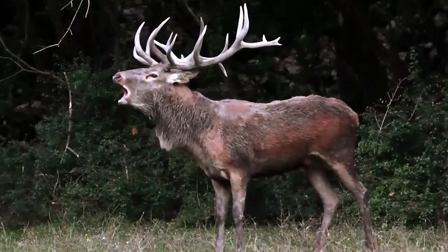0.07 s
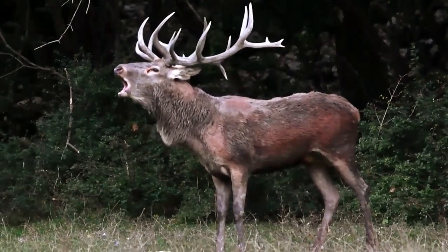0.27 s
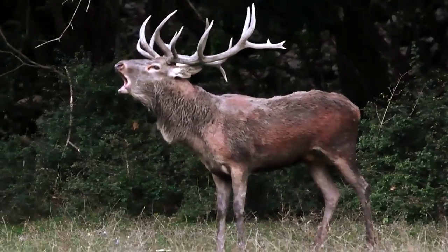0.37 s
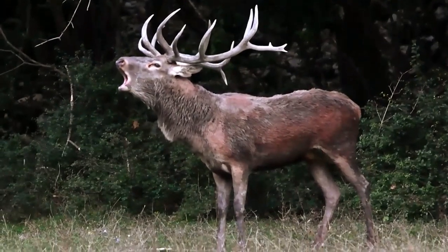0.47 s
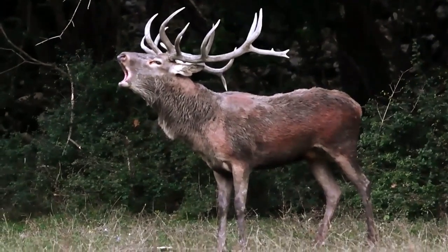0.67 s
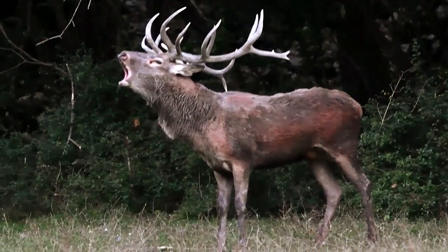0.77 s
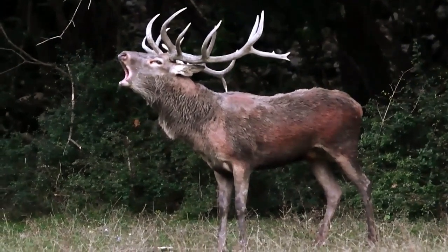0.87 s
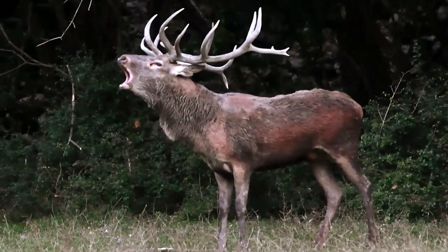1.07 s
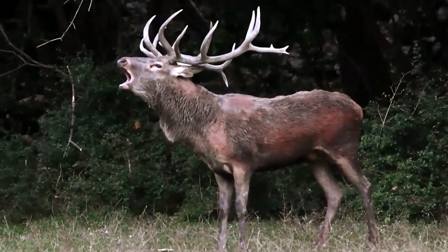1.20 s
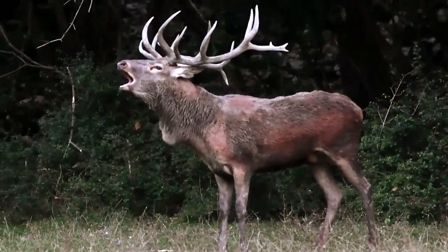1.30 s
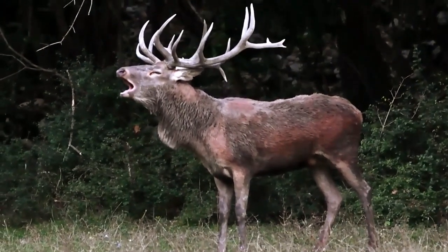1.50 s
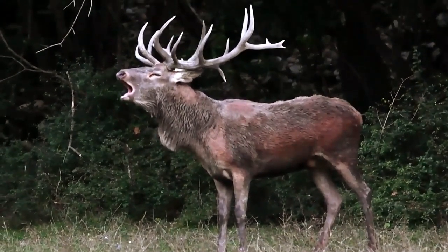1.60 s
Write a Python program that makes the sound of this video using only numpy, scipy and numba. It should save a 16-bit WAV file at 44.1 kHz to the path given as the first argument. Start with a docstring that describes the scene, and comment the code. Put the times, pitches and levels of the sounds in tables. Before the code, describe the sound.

A red deer stag gives one deep, harsh bellow, starting at about 0.2 seconds as a bright, tense roar that rises and swells. From 0.6 seconds the pitch sinks with a breathy hiss, breaking into a coarse rattle around 0.9 seconds. A steadier growl follows at 1.2 seconds and stops near 1.4, leaving a short echo from the trees over a quiet, low outdoor background.

```python
"""A red deer stag bellowing

One long bellow at the edge of a wood, by the source-filter principle: vocal-fold pulses ring a long throat.
A bright, tense roar comes first; the larynx drops and the folds rattle; a steadier growl closes the call.
Breath hisses in the mouth, and the trees echo over a quiet outdoor background that holds a faint
lingering ring of the stag's voice."""
import sys
import numpy as np
from scipy import signal
from scipy.fft import rfft, irfft
from scipy.io import wavfile
from scipy.ndimage import uniform_filter1d
from numba import njit

SR = 44100
rng = np.random.default_rng(int(sys.argv[2]) if len(sys.argv) > 2 else 0)


def transcribe(u):
    """Save the signal u as a 16-bit wav file named by the first command-line argument.

    u: samples, shape (n,) or (channels, n), limited to [-1, 1]; the rate is SR.
    q: integer samples, one column per channel.
    """
    v = np.clip(np.atleast_2d(u).T, -1, 1)
    q = np.round(v * 32767).astype(np.int16)
    wavfile.write(sys.argv[1], SR, q)


N = 72765

# outdoor background, with the voice's lingering ring at 145, 450 and 2200 Hz: frequency_hz, gain_db
BACKGROUND_SPECTRUM = [(25, -31), (45, -4), (62, -12.5), (90, -6.5), (145, -3), (280, -12.5), (380, -6),
                       (450, -3.5), (560, -17), (700, -18), (870, -9.5), (1200, -18.5), (2200, -16.5),
                       (3500, -26.5), (6000, -33.5), (16000, -34.5)]
# further shaping of its left-right difference: frequency_hz, gain_db
BACKGROUND_SIDE_SPECTRUM = [(250, -32), (900, -1.5), (4000, 6.5), (12000, -3)]
# pulse rate of the vocal folds: time_s, pitch_hz
FOLD_PITCH = [(.18, 73.8), (.2, 100), (.226, 113.1), (.27, 121.8), (.318, 135.6), (.4, 132.6),
              (.472, 130.5), (.546, 134.4), (.602, 122.5), (.648, 119.5), (.7, 115.2), (.8, 109.2),
              (.86, 100.5), (.93, 86.34), (1.1, 83.57), (1.17, 87.2), (1.22, 101), (1.39, 98.22)]
# irregularity of the folds: time_s, roughness_fraction
FOLD_ROUGHNESS = [(.18, .04), (.29, .09), (.34, .05), (.5, .06), (.56, .14), (.64, .17), (.69, .07),
                  (.78, .06), (.85, .35), (.92, .8), (1.15, .8), (1.23, .17), (1.33, .16), (1.38, .5)]
# slackness of the folds: time_s, slack_fraction
FOLD_SLACK = [(.2, 0.04), (.28, 0.11), (.35, 0.07), (.47, 0.05), (.51, 0.11), (.55, 0.34), (.7, 0.63),
              (.77, 0.68), (.86, 0.99), (1.15, 0.91), (1.3, 0.79)]
# six lower formants as the neck stretches: time_s, formant1_hz ... formant6_hz
FORMANT_TRACKS = [(.33, 246, 757, 1010, 1216, 1475, 1854), (.48, 252, 664, 965, 1083, 1452, 1906),
                  (.54, 261, 640, 975, 1050, 1448, 1950), (.6, 247.3, 439, 962, 991, 1318, 1910),
                  (.68, 226, 432, 927, 1000, 1270, 1874), (.78, 208, 428, 874, 1120, 1230, 1660),
                  (.88, 193, 487, 788, 1036, 1222, 1618), (1.1, 186, 460, 827, 965, 1201, 1761),
                  (1.25, 210, 512.5, 897, 1074, 1266, 1727), (1.38, 216, 479.4, 865, 1060, 1273, 1863)]
# the same six by state of the folds: width_hz, tense_db, half_slack_db, slack_db
LOWER_FORMANTS = [(54.6, -51, -30, -34), (37.8, -11.5, -8.5, -4.5), (54, -2, 4, -7), (46.3, 4.5, -14, -3.5),
                  (46.5, 6, 2, 1.5), (58, 0.5, 4, -3.5)]
# steady upper formants: centre_hz, width_hz, tense_db, half_slack_db, slack_db
UPPER_FORMANTS = [(1502, 21.5, -29, -8, -6.5), (2152.6, 71.4, -1, 4, -0.5), (2265, 90, -1.5, -2, -12),
                  (2520, 32, -8.5, -4, -5.5), (2875, 113, -8.5, -2, -9), (3019, 92, -18, -7, -13),
                  (3350, 92, -15.5, -9, -18), (3960, 60, -17, -43, -28), (5204, 140, -27.5, -33, -28.5)]
# envelope of the roar: time_s, relative_level_db
ROAR_ENVELOPE = [(0.17, -60), (0.176, -41.5), (0.226, -26), (0.318, -17.5), (0.416, -14.5), (0.544, -18.5),
                 (0.776, -17.5), (0.816, -28), (0.83, -24), (0.87, -35), (0.904, -22.5), (0.914, -27.5),
                 (0.962, -23), (0.978, -24.5), (0.994, -21.5), (1.102, -29), (1.258, -22.5), (1.372, -24.5),
                 (1.38, -36)]
# envelope of the chest resonance: time_s, relative_level_db
CHEST_ENVELOPE = [(0.2, -59), (0.278, -37.5), (0.62, -35.5), (0.882, -22), (1.06, -29.5), (1.17, -23.5),
                  (1.204, -28), (1.224, -26), (1.39, -29.5)]
# chest filter, weak below the resonance: frequency_hz, gain_db
CHEST_SPECTRUM = [(60, -13), (120, -21), (160, 2.5), (230, -2.5), (400, 5.5), (600, -25)]
# envelope of the third harmonic: time_s, level_db
THIRD_ENVELOPE = [(.5, -54), (.62, -42), (.73, -34), (.84, -33.5), (.92, -69), (1.18, -78), (1.25, -36),
                  (1.38, -52)]
# envelope of the breath hiss: time_s, relative_level_db
HISS_ENVELOPE = [(0.2, -69), (0.208, -58), (0.246, -54.5), (0.428, -54.5), (0.666, -35), (0.766, -42.5),
                 (0.832, -36), (0.846, -47.5), (1.17, -51.5), (1.256, -39.5), (1.36, -68), (1.39, -57)]
# steady mouth resonances: centre_hz, width_hz, gain_db
MOUTH_RESONANCES = [(5310, 190, 3.5), (6355, 137, 8), (8620, 630, -3)]
# moving resonance of the jaw opening: time_s, centre_hz
JAW_TRACK = [(.55, 7300), (.67, 7350), (.74, 6670), (.83, 6040), (1.15, 7030), (1.28, 7570)]
# single hard slaps of the folds: start_s, relative_level_db
FOLD_SLAPS = [(.653, 3), (.9, 3), (.948, 2), (.995, 5), (1.02, 5), (1.056, 0), (1.118, -1), (1.166, 1),
              (1.366, 5)]
# share added on the right and taken from the left, mainly treble: frequency_hz, gain_db
RIGHT_BIAS = [(300, -39), (600, -19), (1100, -26.5), (2200, -5), (4000, -38), (8000, -5)]
# scatter from the bushes: frequency_hz, gain_db
BUSH_SPECTRUM = [(300, -23), (600, -19), (1200, -13), (2400, 1.5), (8000, 3)]
# echo from the trees: frequency_hz, gain_db
WOOD_SPECTRUM = [(100, -0.5), (250, 6), (480, 13), (900, 8.5), (2200, 4), (4000, 11), (10000, 13)]
# left-right difference of the reflections: frequency_hz, gain_db
TAIL_SIDE_SPECTRUM = [(250, -51), (600, -10.5), (1800, -1.5)]

START_S, END_S, ATTACK_S, RELEASE_S = .176, 1.385, .002, .022
JITTER_CYCLES, SHIMMER_DB, PUFF_DECAY_CYCLES = .14, 3.0, .25
ROAR_DB, CHEST_DB, FUNDAMENTAL_DB, HISS_DB, SLAP_DB = -1.5, -1.6, -43.5, -4.5, 15
BACKGROUND_DB, BUSH_DB, WOOD_DB = -43, -7, -9
TIME_S = np.arange(N) / SR
SIDE_SIGNS = np.array([[1], [-1]])  # left, right


def undb(db):
    """Amplitude grows tenfold every 20 dB."""
    return 10 ** (np.asarray(db) / 20)


def curve(rows, column=1):
    """Linear interpolation of a table column in time."""
    rows = np.array(rows, float)
    return np.interp(TIME_S, rows[:, 0], rows[:, column])


def unit_rms(x):
    """Normalisation to unit mean power."""
    return x / np.sqrt(np.mean(x ** 2) + 1e-18)


def flatten(x, size=1100):
    """Division by the running rms evens out the envelope."""
    power = uniform_filter1d(uniform_filter1d(x ** 2, size), size)
    return x / np.sqrt(np.abs(power) + np.mean(x ** 2) / 1000)


def colour(x, spectrum):
    """Zero-phase filtering by gains interpolated over log frequency."""
    hz, db = np.array(spectrum, float).T
    bins_hz = np.maximum(np.fft.rfftfreq(x.shape[-1], 1 / SR), 1)
    gain = undb(np.interp(np.log(bins_hz), np.log(hz), db))
    return irfft(rfft(x) * gain, x.shape[-1])


@njit
def bandpass(x, hz, width_hz):
    """A driven, damped oscillator with unit gain at its moving centre."""
    y, band_state, low_state = np.empty(len(x)), 0., 0.
    for i in range(len(x)):
        step, damping = np.tan(np.pi * hz[i] / SR), width_hz / hz[i]
        band = (band_state + step * (x[i] + 1e-18 - low_state)) / (1 + step * (step + damping))
        band_state = 2 * band - band_state
        low_state += 2 * step * band
        y[i] = damping * band
    return y


def resonance(x, hz, width_hz):
    """Filters in cascade: a second, wider band-pass steepens the skirts."""
    hz = hz * np.ones(N)
    return bandpass(bandpass(x, hz, float(width_hz)), hz, width_hz * 3.1)


def impulses(times_s, sizes):
    """Windowed sinc interpolation places band-limited impulses between samples."""
    train, centres = np.zeros(N), np.asarray(times_s)[:, None] * SR
    taps = np.floor(centres).astype(int) + np.arange(-7, 9)
    offset = taps - centres
    np.add.at(train, np.clip(taps, 0, N - 1), np.sinc(offset) * np.sinc(offset / 8) * sizes[:, None])
    return train


def background():
    """Partly coherent noise, alike on both sides in the bass, with a faint ring of the stag's voice."""
    mid, side = colour(rng.standard_normal((2, N)), BACKGROUND_SPECTRUM)
    side = .64 * colour(side, BACKGROUND_SIDE_SPECTRUM)
    return undb(BACKGROUND_DB) * (mid + side * SIDE_SIGNS) / np.std(mid)


def vocal_folds(cycles):
    """Glottal source: each closure gives a pulse and a puff; roughness adds jitter and shimmer."""
    first_cycle = np.interp(START_S + ATTACK_S, TIME_S, cycles) % 1
    regular_s = np.interp(np.arange(int(cycles[-1])) + first_cycle, cycles, TIME_S)
    roughness = np.interp(regular_s, TIME_S, curve(FOLD_ROUGHNESS))
    pitch_hz = np.interp(regular_s, TIME_S, curve(FOLD_PITCH))
    jitter, shimmer = rng.standard_normal((220, 2))[:len(regular_s)].T
    closures_s = np.sort(regular_s + JITTER_CYCLES * roughness ** 1.35 * jitter / pitch_hz)
    pulses = impulses(closures_s, undb(SHIMMER_DB * np.sqrt(roughness) * shimmer))
    phase = np.interp(TIME_S, closures_s, np.arange(len(closures_s))) % 1
    puffs = np.exp(-phase / PUFF_DECAY_CYCLES) * rng.standard_normal(N)
    return unit_rms(pulses), unit_rms(puffs)


def disperse(x, delay_s_per_hz=7e-7):
    """Dispersion: high partials leave the long throat after low ones, rounding each pulse."""
    hz = np.fft.rfftfreq(N, 1 / SR)
    return irfft(rfft(x) * np.exp(-1j * np.pi * delay_s_per_hz * hz ** 2), N)


def throat(source):
    """Formant filtering: parallel resonances whose balance shifts as the folds slacken."""
    slack, source = curve(FOLD_SLACK), disperse(source)
    moving = [(curve(FORMANT_TRACKS, k + 1), *row) for k, row in enumerate(LOWER_FORMANTS)]
    return sum(undb(np.interp(slack, [0, .5, 1], gains_db)) * resonance(source, hz, width_hz)
               for hz, width_hz, *gains_db in moving + list(UPPER_FORMANTS))


def chest_tone(source, cycles, swell_s=.18):
    """Forced resonance at the lowest formant, joined by the folds' first and third harmonics."""
    boom = flatten(resonance(source, curve(FORMANT_TRACKS), width_hz=35))
    boom *= undb(curve(CHEST_ENVELOPE) + CHEST_DB)
    swell = np.clip((TIME_S - START_S) / swell_s, 0, 1)
    fundamental = undb(FUNDAMENTAL_DB) * unit_rms(np.sin(2 * np.pi * cycles)) * swell
    third = undb(curve(THIRD_ENVELOPE)) * unit_rms(np.sin(6 * np.pi * cycles))
    return colour(boom, CHEST_SPECTRUM) + fundamental + third


def breath_hiss(pulses, puffs):
    """Cavity resonance: breath noise and fold pulses excite the mouth and jaw opening."""
    source = puffs + .6 * pulses
    mouth = sum(undb(db) * resonance(source, hz, width_hz) for hz, width_hz, db in MOUTH_RESONANCES)
    jaw = undb(2) * resonance(source, curve(JAW_TRACK), width_hz=950)
    return flatten(mouth + jaw) * undb(curve(HISS_ENVELOPE) + HISS_DB)


def diffuse_tail(t60_s, rise_s, spectrum):
    """Dense reflections merge into exponentially decaying stereo noise."""
    mid, side = rng.standard_normal((2, N))
    noise = colour(mid + colour(side, TAIL_SIDE_SPECTRUM) * SIDE_SIGNS, spectrum)
    fade = np.clip(TIME_S / rise_s, 0, 1) * np.exp(-np.log(1000) * TIME_S / t60_s)
    return noise * fade / np.sqrt(2 * np.sum(fade ** 2))


def bush_scatter(sound):
    """Early scattering: bushes return mostly treble within milliseconds."""
    response = diffuse_tail(t60_s=.014, rise_s=.0073, spectrum=BUSH_SPECTRUM)[0]
    return undb(BUSH_DB) * signal.fftconvolve(sound, response)[:N]


def wood_echo(sound):
    """Reverberation: reflections from many trees prolong the call."""
    response = diffuse_tail(t60_s=.68, rise_s=.0083, spectrum=WOOD_SPECTRUM)
    return undb(WOOD_DB) * signal.fftconvolve(sound[None], response, axes=1)[:, :N]


def fold_slaps():
    """Impulse response: single hard closures of the folds ring the throat."""
    start_s, level_db = np.array(FOLD_SLAPS).T
    return throat(impulses(start_s, undb(level_db + SLAP_DB)))


def scene():
    """Superposition of the stag, a little to the right, its reflections and the background."""
    cycles = np.cumsum(curve(FOLD_PITCH)) / SR
    pulses, puffs = vocal_folds(cycles)
    source = pulses + (.06 + .3 * curve(FOLD_ROUGHNESS)) * puffs  # breathier when rough
    attack = np.clip((TIME_S - START_S) / ATTACK_S, 0, 1)
    gate = attack * np.exp(-np.maximum(TIME_S - END_S, 0) / RELEASE_S)
    roar = flatten(throat(source)) * undb(curve(ROAR_ENVELOPE) + ROAR_DB)
    bright = gate * (roar + breath_hiss(pulses, puffs)) + fold_slaps()
    bellow = bright + gate * chest_tone(source, cycles)
    side = bush_scatter(bright) - colour(bright, RIGHT_BIAS)
    return bellow + side * SIDE_SIGNS + wood_echo(bellow) + background()


def record(dry):
    """Band limiting: a steep low-pass removes the highest treble."""
    cutoff_hz = 15800
    return signal.sosfilt(signal.ellip(10, .2, 80, cutoff_hz, fs=SR, output="sos"), dry)


dry = scene()
out = record(dry)
transcribe(out)
```